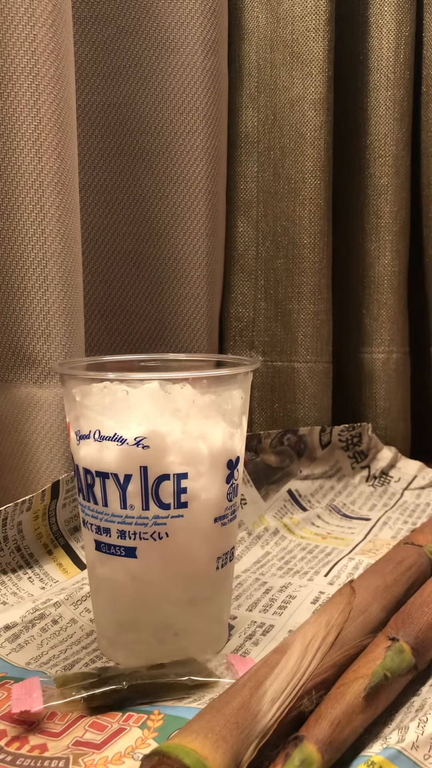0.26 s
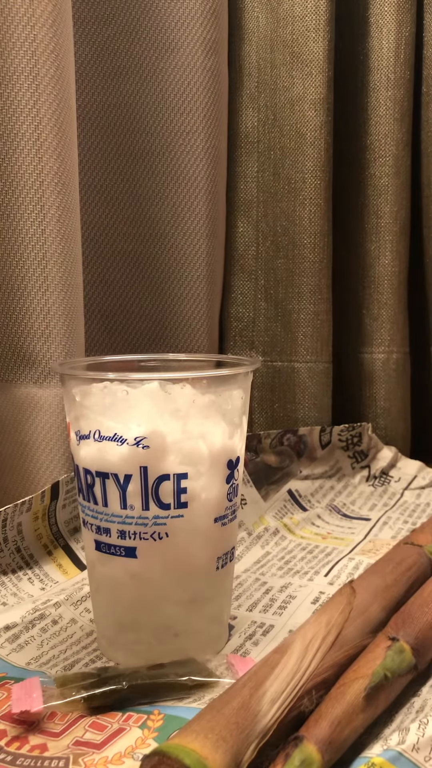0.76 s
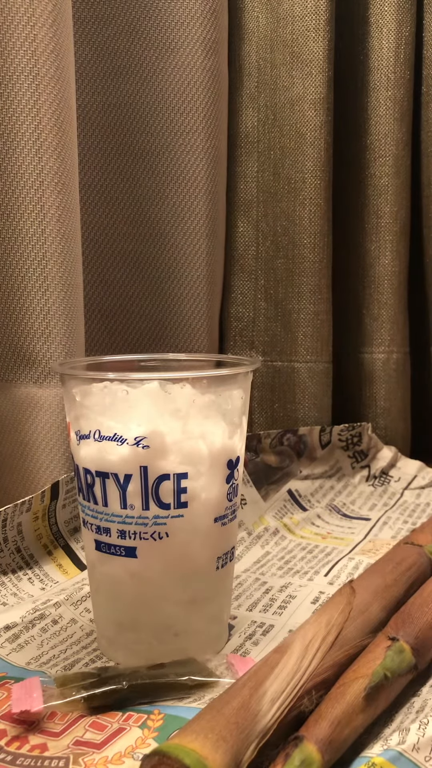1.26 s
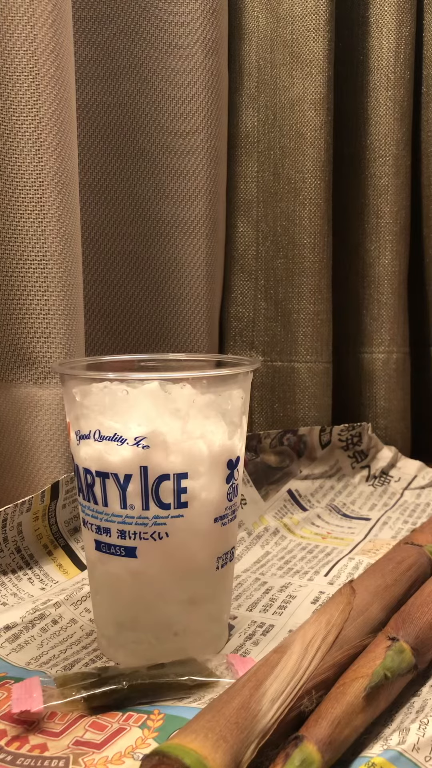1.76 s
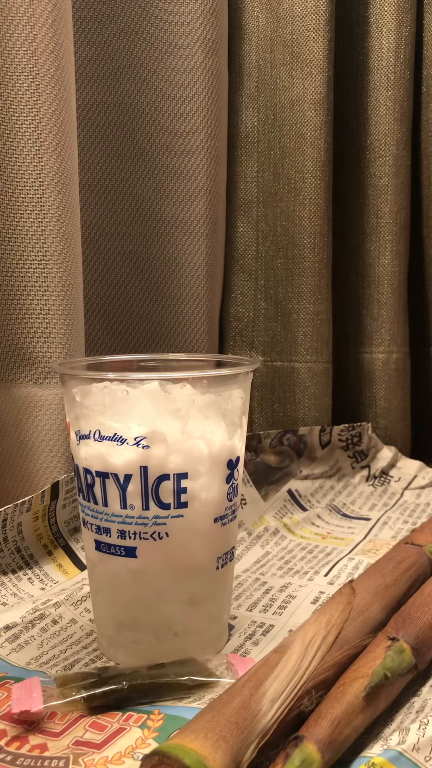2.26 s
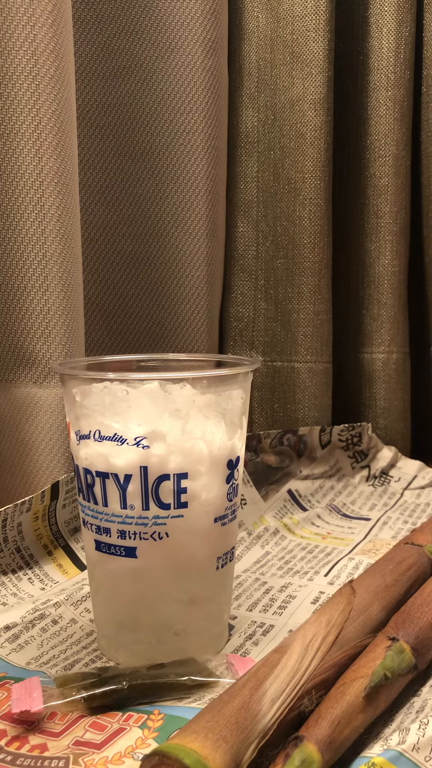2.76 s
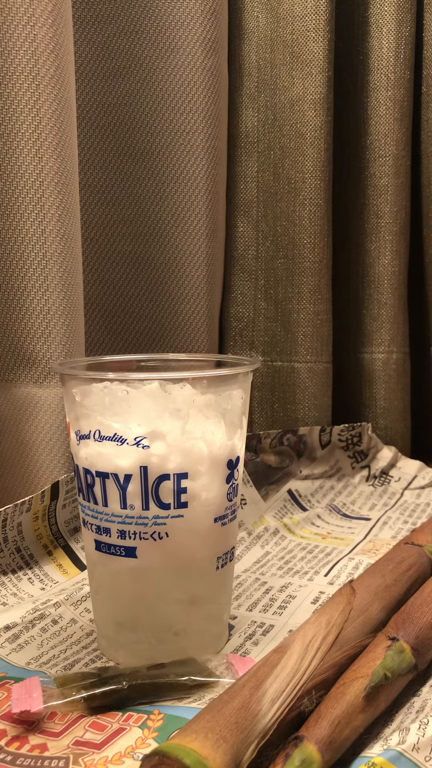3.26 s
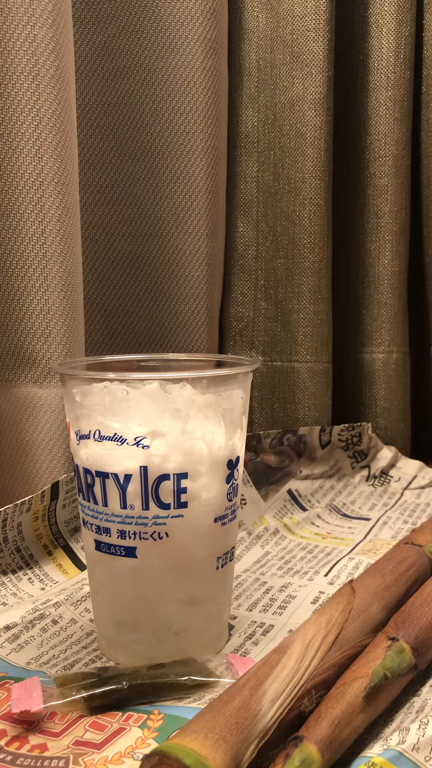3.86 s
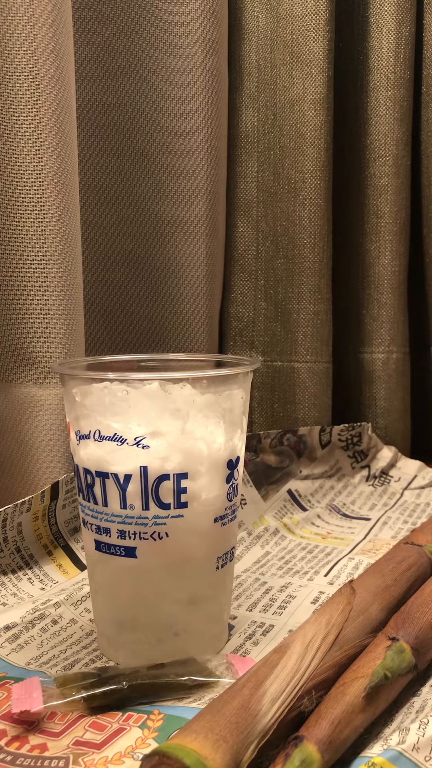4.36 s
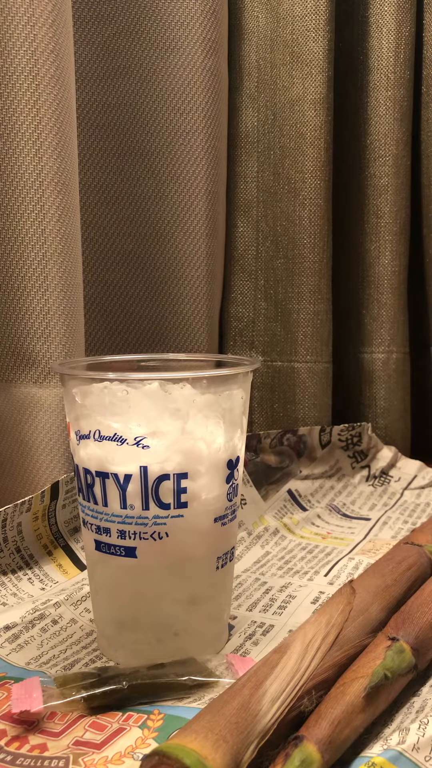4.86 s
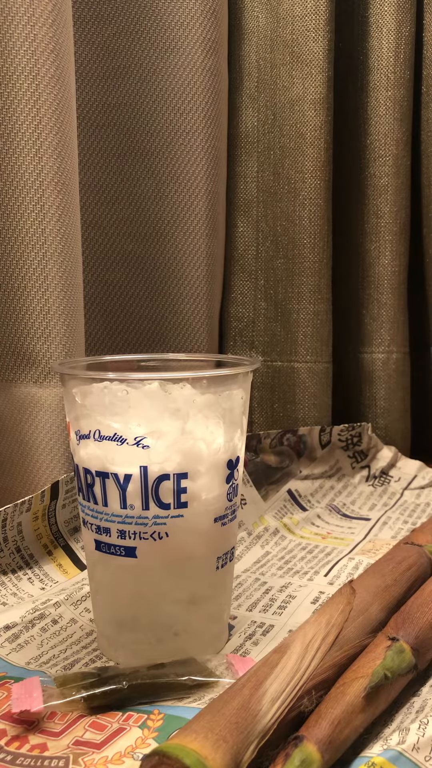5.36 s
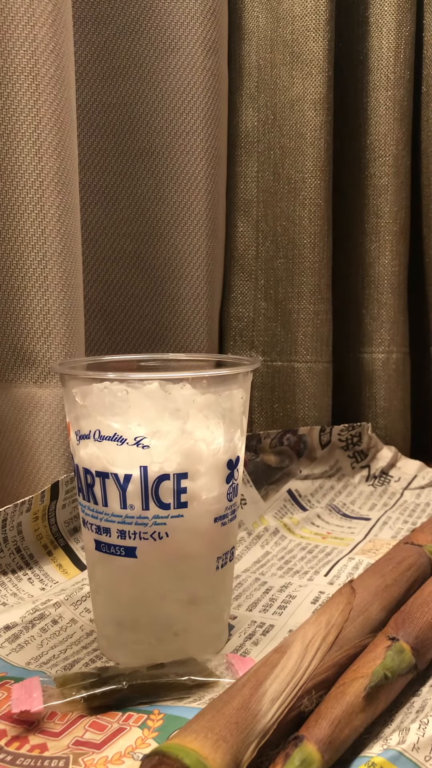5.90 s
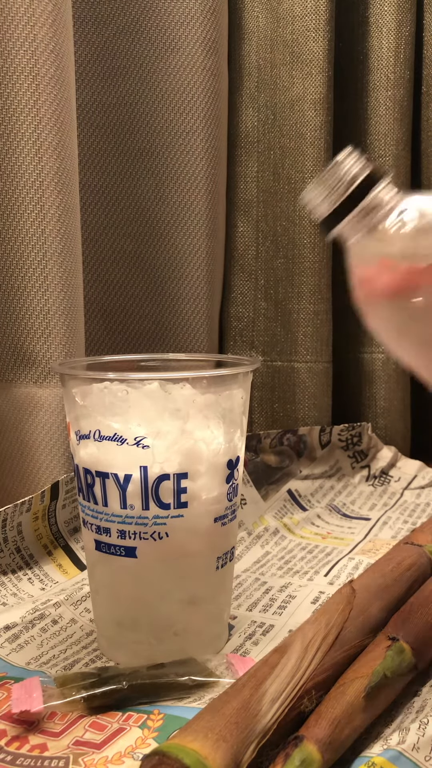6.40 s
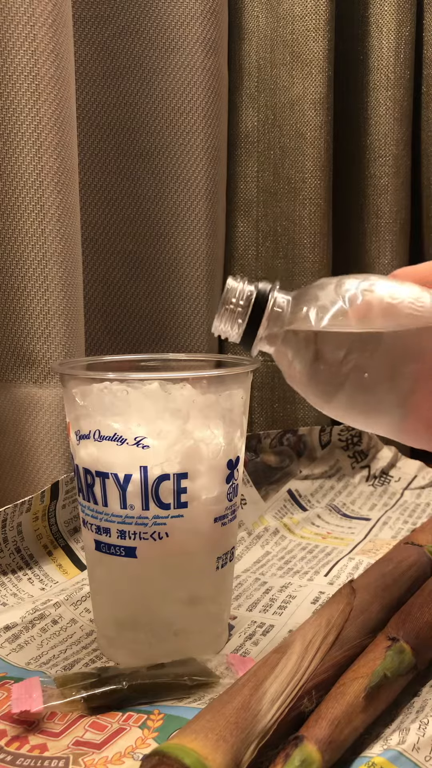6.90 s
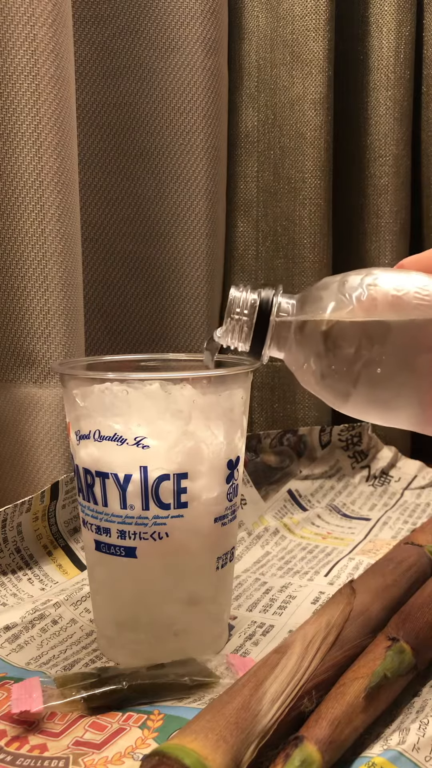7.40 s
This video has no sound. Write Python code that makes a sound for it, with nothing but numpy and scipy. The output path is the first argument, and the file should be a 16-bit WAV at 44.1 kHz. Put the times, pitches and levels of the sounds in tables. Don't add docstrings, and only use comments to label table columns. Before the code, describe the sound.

Close to a phone microphone in a small, soft curtained room, a faint fan rumble and mains hum run throughout. Hands bump the table, a bottle neck creaks, and ice cracks with a loud bright snap. The plastic seal ticks and seeps, then breaks with a brief strong gas hiss. The cap scrapes off its thread, clacks on the table, bounces and spins to rest. Finally, faint ice clinks and soft thuds.

```python
import sys
import numpy as np
from scipy import signal
from scipy.fft import rfft, irfft, next_fast_len
from scipy.io import wavfile
from scipy.ndimage import uniform_filter1d

SR = 44100
rng = np.random.default_rng(int(sys.argv[2]) if len(sys.argv) > 2 else 0)


def ratio(d):
    e = np.asarray(d, float) / 20
    return 10 ** e


def generate_wav(signal):
    frames = np.transpose(np.atleast_2d(signal))
    scaled = np.clip(frames, -1, 1) * 32767
    pcm = np.round(scaled).astype(np.int16)
    wavfile.write(sys.argv[1], SR, pcm)


N = 336924
TIME = np.arange(N) / SR

# [f/Hz, width/Hz, boost/dB]
NECK = [(1410, 388.3, 6.5), (2660, 607.09, 2.5), (5810, 3300, 1)]
BOTTLE = [(950, 63, 8.8), (1290, 200, 2.4), (1870, 250, 3.3), (2546, 450, 2.6), (3900, 360, 1.3)]
SHELL = [(355, 33, 12), (620, 690, 9.5), (1290, 130, -5), (1940, 130, 2), (4570, 450, -19), (7130, 190, 14),
         (10500, 3700, 4.5)]
# [bass level/dB at 2 kHz ring, bass loss/dB per octave of ring, contact decay/s]
TOUCH = dict(cube=(-15.5, 3.8, 0.018), creak=(-21, 2.2, 0.025), seal=(-12.5, 1, 0.012),
         thread=(-9.5, 1.5, 0.017), ice=(-6.5, 2.1, 0.035), drop=(-8, 0, 0.01), cap=(-10.5, 10.3, 0.022),
         slip=(-21, 3, 0.017))


def unit(x):
    return x / np.sqrt(np.mean(x ** 2))


def colour(x, points, modes=()):
    size = next_fast_len(len(x), True)
    hz = np.fft.rfftfreq(size, 1 / SR) + 1
    at, db = np.transpose(points)
    ring = 1
    for f, width, boost_db in modes:
        ring = ring + ratio(boost_db) * 1j * hz * width / (f * f - hz * hz + 1j * hz * width)
    tone = ratio(np.interp(np.log(hz), np.log(at), db))
    return irfft(rfft(x, size) * tone * ring, size)[:len(x)]


def walk(rate):
    k = int(SR / rate)
    steps = np.repeat(rng.standard_normal(N // k + 1), k)
    return unit(uniform_filter1d(uniform_filter1d(steps, k), k)[:N])


def swell(s, peak_db, rise, hold, fall):
    return peak_db - 20 * np.maximum(np.maximum((s - TIME) / rise, (TIME - s - hold) / fall), 0)


def add(out, s, x, lead=0):
    i = max(int(s * SR) - lead, 0)
    out[i:i + len(x)] += x[:N - i]


def clicks(rows, modes, touch, middle_db=0, top_db=-4, edge_hz=3600, ring_db=4, ring_width=0.23,
           rise_s=0.0001, snap_db=-20, thin_db=0):
    out, lead, t = np.zeros(N), 256, np.arange(8192) / SR
    body_db, loss_db, decay = touch
    fade = ratio(-30 * t / max(decay, 0.002))
    snap = 1 + ratio(snap_db) * np.exp(-t / 0.0005)
    for s, peak_db, hz, treble_db in rows:
        bass_db = body_db - loss_db * np.log2(hz / 2000)
        burst = rfft(rng.standard_normal(len(t)) * fade)
        burst = irfft(burst / uniform_filter1d(np.abs(burst), size=60))
        burst = burst * fade * snap * (1 - np.exp(-t / rise_s))
        tilt = [(150, bass_db + 2.0 + 2 * thin_db), (450, bass_db + 11.0 + thin_db), (1000, bass_db + 13.0),
                (3000, middle_db), (edge_hz, middle_db), (9000, treble_db + 6.0), (16000, treble_db + top_db)]
        struck = [(f * (1 + 0.008 * rng.standard_normal()), w, boost_db) for f, w, boost_db in modes]
        spot = (hz, ring_width * hz, ring_db)
        hit = colour(np.roll(burst, lead), tilt, struck + [spot])
        add(out, s, hit * ratio(peak_db) / np.abs(hit).max(), lead)
    return out


def chatter(strokes, modes, per_s, spread_db, edge_db, lumpy_db):
    ticks = (rng.random(N) < per_s / SR) * ratio(spread_db * rng.standard_normal(N)) * rng.standard_normal(N)
    ticks = ticks * ratio(lumpy_db * walk(70))
    dull_tone = [(120, -20.0), (350, -2.5), (3300, 3.0), (5000, -7.0), (8000, -7.0), (10000, -44.0)]
    dull = unit(colour(ticks, dull_tone, modes))
    fizz = uniform_filter1d(np.abs(ticks), 200) * rng.standard_normal(N)
    bright = unit(colour(fizz, [(5000, -30), (7500, 0), (12000, -4), (16000, -16)], modes))
    strength = sum(ratio(swell(*row) - 3.5) for row in strokes)
    return strength * (dull + ratio(edge_db) * bright)


def air():
    # [f/Hz, level/dB per Hz]
    fan = [(13, -37), (26, -16), (49, -4.5), (90, -12), (123, -8), (274, -17), (332, -13.5), (438, -18),
           (517, -18.5), (721, -24), (784, -24), (1160, -27), (6260, -31.5), (15200, -43.5), (16500, -64)]
    # [f/Hz, level/dB]
    ripple = [(1500, 0), (2200, -0.5), (4000, 1.5), (6300, -1), (7200, -2), (9000, -1), (15000, 1),
              (15800, -1)]
    # [f/Hz, level/dB, width/Hz]
    motor = [(44.3, -67.5, 6.5), (76.3, -70, 8.7), (350.5, -75.5, 66), (512, -73, 11), (794, -75.5, 2.5),
             (1050, -82, 20)]
    mains = [(119.9, -60, 9.9)]
    noise = unit(colour(colour(rng.standard_normal(N), fan), ripple)) * ratio(-57)
    for lines, steady in ((motor, 2.5), (mains, 7)):
        for hz, line_db, width in lines:
            angle = 2 * np.pi * hz * TIME
            sway = (steady + walk(width)) * np.sin(angle) + walk(width) * np.cos(angle)
            noise = noise + ratio(line_db) * unit(sway)
    bass = colour(noise, [(400, 0), (1200, -35)])
    treble = noise - bass
    step_s, ramp_s = 0.477, 0.011
    shut = np.clip((step_s + ramp_s - TIME) / ramp_s, 0, 1)
    bass_db = -5.5 * shut - 0.03 * TIME + 0.5 * walk(9)
    treble_db = -13.5 * shut - 0.32 * TIME + 0.4 * walk(20)
    return bass * ratio(bass_db) + treble * ratio(treble_db)


def knocks():
    # [t/s, peak level/dB, f/Hz, ring/s]
    bumps = [(0.009, -51.5, 89, 0.13), (0.078, -54, 100.9, 0.13), (0.412, -44, 94.4, 0.34),
             (0.515, -36, 126.5, 0.26), (0.56, -47, 147, 0.16), (0.607, -34, 129.6, 0.23),
             (0.66, -47, 139.5, .2), (1.169, -64, 72.9, 0.1772), (3.932, -41.5, 129.4, 0.21),
             (5.377, -41.5, 140.4, 0.17), (5.477, -47, 143.6, 0.33), (5.539, -58, 129.7, 0.2007),
             (5.6, -44.5, 142, 0.2104), (5.654, -46, 135, 0.1995), (6.942, -57, 126.6, 0.12),
             (7.2225, -34, 93.5, 0.11), (7.253, -43, 100, .08), (7.34, -44, 105, 0.12)]
    # [t/s, peak level/dB, f/Hz, ring/s]
    taps = [(0.036, -47.5, 327, 0.042), (0.121, -51, 296, 0.13), (0.282, -55, 352, 0.11),
            (0.52, -48, 287, 0.15), (0.616, -50, 188, 0.1223), (0.869, -54, 512, 0.1),
            (1.17, -54, 525, 0.1663), (1.691, -49, 950, 0.093), (1.701, -45, 522, 0.091),
            (1.883, -38, 370, 0.032), (2.843, -42.5, 552, 0.086), (2.929, -49, 546, 0.11),
            (3.937, -35, 516, 0.09), (4.598, -52, 343.3, 0.18), (4.635, -49, 268, 0.31),
            (4.745, -46, 523, 0.06556), (4.925, -42, 332, 0.15), (5.372, -27, 624, 0.023),
            (5.388, -39, 345, 0.072), (5.494, -37, 345, 0.12), (5.553, -38, 344, 0.11),
            (5.698, -42, 345, 0.15), (5.478, -29, 590, 0.037), (5.529, -41, 600, .04),
            (5.541, -33, 610, 0.045), (5.594, -32.5, 600, 0.042), (5.642, -38, 597, .06),
            (5.69, -39, 643, 0.054), (5.725, -39, 620, 0.054), (5.62, -42, 367, 0.089),
            (5.678, -38, 622, 0.07), (5.813, -32.5, 557, 0.063), (5.865, -40, 592, 0.0846),
            (5.904, -49.5, 572, 0.12), (1.206, -58, 1050, 0.11), (2.29, -58.5, 1050, 0.24),
            (2.95, -57, 1045, 0.11), (3.89, -42, 532, 0.086), (3.545, -50, 550, 0.13),
            (7.207, -41, 657, 0.031)]
    out, t = np.zeros(N), np.arange(SR // 2) / SR
    for s, peak_db, hz, ring in bumps + taps:
        push = 1 - np.exp(-t / 0.0028)
        fade = np.exp(-np.log(1000) * t / ring)
        add(out, s, ratio(peak_db) * push * fade * np.sin(2 * np.pi * hz * t))
    return out


def rustle():
    # [t/s, level/dB, rise/s, fall/s, drag share/dB]
    moves = [
        (.3, -93, 0.4766, 0.39, 20.5),
        (2.324, -70.5, 0.25, 0.077, 8),
        (6.252, -65.5, 0.34, 0.98, -8),
        (6.63, -73, 0.41, 0.36, 6.5),
        (7.39, -76.5, 0.45, 0.12, 10.5),
    ]
    fine_tone = [(1500, -8.0), (2500, 0.5), (3500, 2.0), (5200, -5.5), (8000, -42.0)]
    drag_tone = [(500, -0.5), (1000, -4.0), (1800, -5.5), (3000, -35), (8000, -57.0)]
    fine = unit(colour(rng.standard_normal(N), fine_tone)) * ratio(0.57 * walk(26))
    drag = unit(colour(rng.standard_normal(N), drag_tone)) * ratio(3.7 * walk(37))
    return sum(ratio(swell(s, db, rise, 0, fall)) * (fine + drag * ratio(drag_db))
               for s, db, rise, fall, drag_db in moves)


def ice_in_cup():
    # [t/s, peak level/dB, ring f/Hz, treble share/dB]
    taps = [(0.5385, -51, 1425, -18), (1.1692, -47, 1450, -16), (2.1794, -51, 1960, -16),
            (2.92, -48, 1250, -4), (3.1268, -47.5, 3350, -12), (6.9687, -34, 3533, -19),
            (6.985, -46, 1975, -25), (7.0004, -44, 2076, -28.5), (7.0838, -47, 1363, -25),
            (7.2055, -44, 3475, -13), (7.254, -49, 2460, -15), (7.3793, -55, 1513, -21)]
    # [f/Hz, width/Hz, boost/dB]
    cup = [(1060, 80, 6.3), (1300, 110, 6.3), (1980, 140, 6), (2610, 120, 6.35), (3500, 110, 3)]
    return clicks(taps, cup, TOUCH["ice"], -1.5, ring_db=7.0, ring_width=0.06)


def ice_cracks():
    # [t/s, peak level/dB, ring f/Hz, treble share/dB]
    splits = [(1.0294, -46.5, 5200, -3), (1.4754, -54.5, 5390, -5), (1.5194, -47, 7610, -14),
              (1.879, -40, 5800, -8), (1.8818, -11.5, 5800, -9), (1.8848, -11, 6100, -15),
              (1.8875, -22, 4500, -13), (1.89, -17.5, 4300, -11.5), (1.8935, -24, 8200, -4),
              (1.9105, -31, 6900, -2), (1.925, -34, 5600, -8), (1.9315, -34, 4400, -10),
              (2.028, -42, 10500, -3.5)]
    # [f/Hz, width/Hz, boost/dB]
    block = [(1570, 100, 3.5), (1930, 380, 9), (4250, 160, 23), (4650, 270, 15), (5100, 170, 17),
             (5500, 200, 17), (5870, 200, 18.5), (6600, 230, 12), (7060, 400, -1), (12050, 3100, 13.5)]
    return clicks(splits, block, TOUCH["cube"], -18, edge_hz=3200, snap_db=1)


def squeaks():
    # [t/s, peak level/dB, f/Hz, length/s]
    slips = [(3.365, -53, 2210, 0.043), (3.378, -49, 2680, .06), (3.362, -53, 3300, .1),
             (3.397, -51, 2900, .04), (3.42, -53, 2750, .09), (3.425, -49, 5950, .04),
             (4.626, -47, 3900, .015), (4.649, -45, 3900, .03), (4.565, -50, 4000, .03),
             (4.313, -44, 2450, .03), (4.3195, -41, 2530, .014), (1.169, -51, 1400, .04),
             (6.968, -41, 1327, .03), (6.984, -48, 1043, .06), (7.084, -52, 1300, .04),
             (1.895, -42, 1560, .12), (1.91, -46, 1900, .1)]
    out = np.zeros(N)
    for s, peak_db, hz, length in slips:
        out += clicks([(s, peak_db, hz, -20)], [], (-30, 5, length), ring_db=30, ring_width=0.05, rise_s=0.002)
    return out


def gas():
    # [t/s, peak level/dB, rise/s, fall/s, top hiss share/dB]; rise and fall span 20 dB
    puffs = [
        (1.49, -63.5, 0.15, 1.2, -3.5),
        (1.675, -53.5, 0.04, 0.0961, -6),
        (1.703, -40.5, 0.022, 0.02551, -2),
        (1.73, -57, 0.01966, 0.25, -5),
        (1.876, -49.5, 0.031, 0.00641, -2.5),
        (4.12, -48, .01, 0.22, -7),
        (5.817, -54, 0.073, 0.024, -1),
        (5.855, -53.5, 0.012, 0.0462, -3),
    ]
    crack_tail = [
        (1.9, -40, .003, 0.11, -14.5),
    ]
    seep = [
        (3.425, -50, 0.08244, 0.089, 0.5),
        (3.52, -62.5, 0.14, 0.27, 2),
        (3.645, -56, 0.12, .05, -2.5),
        (3.823, -56.5, 0.081, 0.038, 3.5),
    ]
    # [f/Hz, width/Hz, boost/dB]
    slit = [(6000, 570, 1.5), (7330, 510, 4), (8688.4, 500, -1.5), (11150, 831.7, 2.5), (15060, 1300, 7.5)]
    # [t/s, flow level/dB]
    opening = [
        (3.927, -56.5),
        (3.936, -29),
        (3.95, -21.5),
        (3.972, -15),
        (3.995, -13),
        (4.02, -14.5),
        (4.043, -21.5),
        (4.06, -35),
        (4.1, -48.5),
    ]
    low_tone = [(300, -43.5), (1200, -15.5), (2500, -1.5), (4200, 0), (5500, -14.0), (20000, -47.0)]
    mid_tone = [(2500, -25.5), (4500, -2.5), (5800, 0.5), (7000, -2.0), (10000, -1.0), (12000, -23.0)]
    top_tone = [(8000, -44.0), (10500, -2.5), (13500, 1.5), (15300, 0.0), (17000, -6.0)]
    low, mid, top = [unit(colour(rng.standard_normal(N), tone)) for tone in (low_tone, mid_tone, top_tone)]

    def jet(flow_db, low_db, top_db):
        return ratio(flow_db - 4.5) * (mid + ratio(low_db) * low + ratio(top_db) * top)

    def swells(rows, low_db):
        return sum(jet(swell(s, db, rise, 0, fall), low_db, top_db) for s, db, rise, fall, top_db in rows)

    whistle = colour(swells(seep, -3), [(1000, 2.5), (16000, -4.0)], slit) * ratio(1.3 * walk(90))
    crack_tail_tone = [(1000, -8), (1600, 9), (2100, -1), (2500, -18), (3650, -18), (4000, 3.5), (7500, 1), (12000, -11)]
    leak = whistle + swells(puffs, -6.5) + colour(swells(crack_tail, -7.5), crack_tail_tone)

    at, flow_db = np.transpose(opening)
    flow = np.interp(TIME, at, flow_db, -120, -120)
    narrow_db = -13.5 + 7 * np.exp(-np.clip(TIME - at[0], 0, 1) / 0.0098)
    droplets = ratio(1.5 * walk(600) + 0.33 * walk(150))
    burst = jet(flow, narrow_db, 7 + 0.32 * flow) * droplets
    return leak + burst


def neck_creak():
    # [t/s, peak level/dB, ring f/Hz, treble share/dB]
    jumps = [
        (1.6906, -27, 6000, -4),
        (1.6972, -23, 3420, -14),
        (1.7055, -35, 3600, -9),
    ]
    return clicks(jumps, NECK, TOUCH["creak"], edge_hz=6100, snap_db=-1)


def collar_slip():
    # [t/s, peak level/dB, ring f/Hz, treble share/dB]
    ticks = [
        (3.3448, -35, 2596, -6),
        (3.3495, -35, 3600, -8),
        (3.3514, -26.5, 2750, -16),
        (3.3545, -33, 3300, -4),
        (3.3595, -44, 5200, -8),
    ]
    # [f/Hz, width/Hz, boost/dB]
    collar = [(2250, 200, 9), (2700, 300, 14), (3300, 300, -7), (4640, 300, 5), (5200, 450, 8)]
    return clicks(ticks, collar, TOUCH["slip"], -3, edge_hz=5500, snap_db=5)


def seal_snaps():
    # [t/s, peak level/dB, ring f/Hz, treble share/dB]
    breaks = [
        (3.7763, -48, 1940, -16),
        (3.8886, -15, 3900, -7),
        (3.8915, -22, 2409, -11.5),
        (3.9304, -37, 2230, -8.5),
        (3.9365, -8, 2200, -19),
        (3.9388, -17.5, 1407, -18.5),
    ]
    return clicks(breaks, NECK, TOUCH["seal"], snap_db=-0.5)


def thread_ticks():
    # [t/s, peak level/dB, ring f/Hz, treble share/dB]
    catches = [(4.2818, -45.5, 2080, -20), (4.3215, -39, 2504, -23), (4.3442, -48, 2550, -23),
               (4.4734, -42, 2080, -10.5), (4.4805, -44, 925, -9), (4.5186, -39, 2500, -10.5),
               (4.5518, -37, 950, -41.5), (4.5775, -35.5, 950, -18), (4.6, -44, 1360, -23.5),
               (4.627, -45, 3900, -25), (4.638, -32.5, 1890, -18), (4.652, -39, 1870, -20),
               (4.6715, -36.5, 930, -19), (4.6864, -36.5, 2527, -17), (4.7398, -37.5, 2500, -10),
               (4.7422, -28, 4510, -14), (4.7442, -24.5, 1350, -15), (4.7475, -36, 2500, -15),
               (4.7612, -38, 968, -13), (4.763, -37, 7360, -8), (4.8494, -45, 1870, -11),
               (4.913, -45, 2763, -22.5), (4.9287, -42, 1900, -33)]
    return clicks(catches, BOTTLE, TOUCH["thread"], ring_db=7.0, ring_width=0.12, rise_s=0.00031, snap_db=4.5)


def twisting():
    # [t/s, level/dB, rise/s, hold/s, fall/s]
    scrapes = [
        (4.302, -54, 0.0028, 0.029, 0.047),
        (4.52, -39, .002, 0.0011, 0.01049),
        (4.635, -49.5, 0.1, 0.055, 0.05),
        (4.75, -60, .003, 0, 0.037),
        (4.78, -72, 0.00992, 0.1078, 0.002747),
    ]
    return chatter(scrapes, BOTTLE, 4000, 1.5, -16.5, 1.5)


def cap_drop():
    # [t/s, peak level/dB, ring f/Hz, treble share/dB]
    taps = [
        (5.3688, -16.5, 2600, -31),
        (5.3708, -23.5, 1750, -19),
        (5.3765, -30.5, 2710, -26),
        (5.3785, -32, 3700, -24),
        (5.384, -37, 2050, -24),
    ]
    return clicks(taps, NECK[:2], TOUCH["drop"], edge_hz=3900, snap_db=3, thin_db=-3)


def cap_bounces():
    # [t/s, peak level/dB, ring f/Hz, treble share/dB]
    bounces = [(5.4744, -20, 1300, -6), (5.48, -13,  4460, -20.5), (5.4835, -23, 4500, -24),
               (5.5288, -17, 4660, -26), (5.5404, -19, 1610, -4), (5.5445, -30, 1290, -20),
               (5.559, -27, 4300, -14), (5.5628, -29, 2000, -16), (5.5741, -32, 4000, -21.5),
               (5.5935, -36, 1500, -20), (5.6015, -25, 1290, -20), (5.6051, -26.5, 4630, -23),
               (5.6154, -36, 2000, -20), (5.6415, -35.5, 2600, -14), (5.65, -30.5, 1000, -20),
               (5.656, -23, 7020, -21), (5.6705, -37, 2500, -20), (5.6785, -33, 2000, -7),
               (5.6884, -32, 1700, -13), (5.6965, -32, 1500, -20), (5.7024, -35, 4500, -20),
               (5.716, -40, 2000, -22), (5.8101, -37.5, 2706, -22), (5.847, -42, 1396, -10),
               (5.8561, -41.5, 3430, -22)]
    return clicks(bounces, SHELL, TOUCH["cap"], 0, -6, edge_hz=5000, snap_db=3.5, thin_db=-5)


def cap_spin():
    # [t/s, level/dB, rise/s, hold/s, fall/s]
    rolls = [
        (5.486, -33, 0.0046, 0.0031, 0.024),
        (5.53, -42.5, 0.0035, 0.017, 0.71),
    ]
    edge_db = -5.5 - 51 * np.abs(TIME - rolls[1][0])
    end_s = 5.71
    return chatter(rolls, SHELL, 5000, 1.2, edge_db, 1.5) * ratio(swell(0, 0, 1, end_s, 0.058))


def pipe_drone():
    # t/s, level/dB, rise/s, hold/s, fall/s
    pipe = (6.99, -59.5, .06, .29, .07)
    return ratio(swell(*pipe) + 2 * walk(29)) * np.sin(2 * np.pi * 204 * TIME)


def room(x):
    # [f/Hz, time to fall 60 dB/s]
    curtains = [(700, .4), (2000, 0.39), (5500, 0.32), (9000, 0.3), (15000, 0.23)]
    t = np.arange(SR // 2) / SR
    late = t > 0.0037
    hz, t60 = np.transpose(curtains)
    echoes = rfft(rng.standard_normal(len(t)))
    log_hz = np.log(np.fft.rfftfreq(len(t), 1 / SR) + 1)
    tail = np.zeros(len(t))
    for share, fall_s in zip(np.eye(len(hz)), t60):
        band = irfft(echoes * np.interp(log_hz, np.log(hz), share), len(t))
        tail += band * ratio(-60 * t / fall_s)
    echoes = rfft(tail * late)
    size = np.abs(echoes)
    even = echoes / uniform_filter1d(size, size=80) * uniform_filter1d(size, size=900)
    tail = irfft(even, len(t)) * late * np.clip(4 - 10 * t, 0, 1)
    return x + ratio(-8) * signal.fftconvolve(x, tail / np.sqrt(np.sum(tail ** 2)))[:N]


def scene():
    # [f/Hz, level/dB]
    desk = [(600, 2.5), (680, -2.5), (760, -10), (880, -2), (1000, -1)]
    ice = ice_in_cup() + ice_cracks()
    bottle = gas() + neck_creak() + collar_slip() + seal_snaps() + thread_ticks() + twisting()
    cap = cap_drop() + cap_bounces() + cap_spin()
    in_room = room(colour(ice + bottle + cap, desk))
    mix = air() + knocks() + rustle() + in_room + ratio(0.5) * squeaks() + pipe_drone()
    return mix[None]


def roll_off(x):
    return signal.sosfilt(signal.butter(12, 16880, fs=SR, output="sos"), x)


def record(dry):
    no_rumble = signal.butter(6, 36, "high", fs=SR, output="sos")
    no_top = signal.ellip(9, 0.3, 45, 16050, fs=SR, output="sos")
    mix = signal.sosfilt(np.vstack([no_rumble, no_top]), dry)
    return roll_off(mix)


dry = scene()
out = record(dry)
generate_wav(out)
```